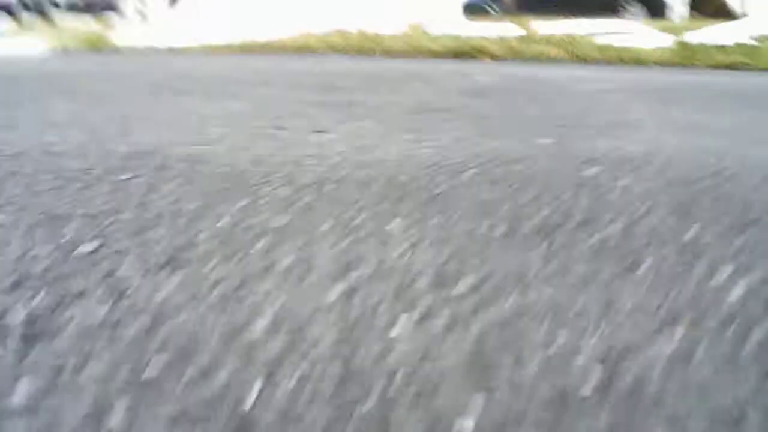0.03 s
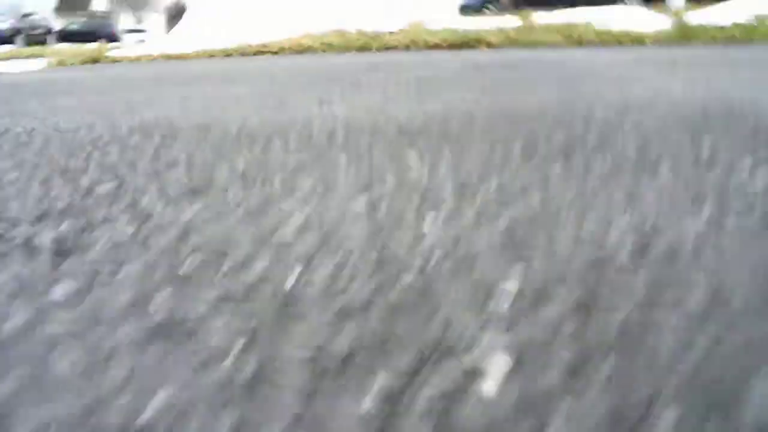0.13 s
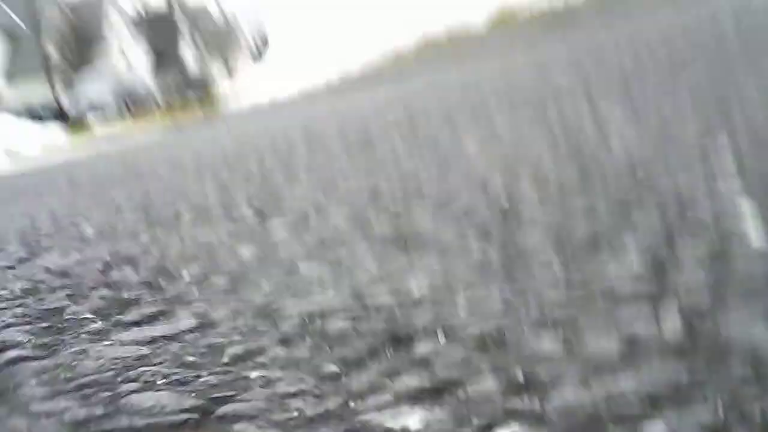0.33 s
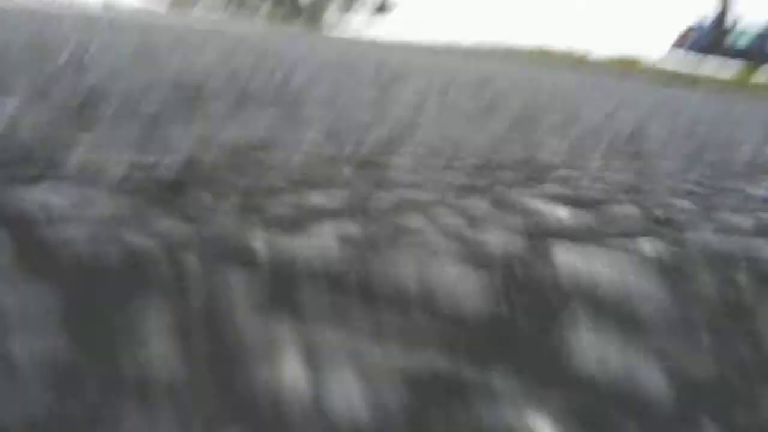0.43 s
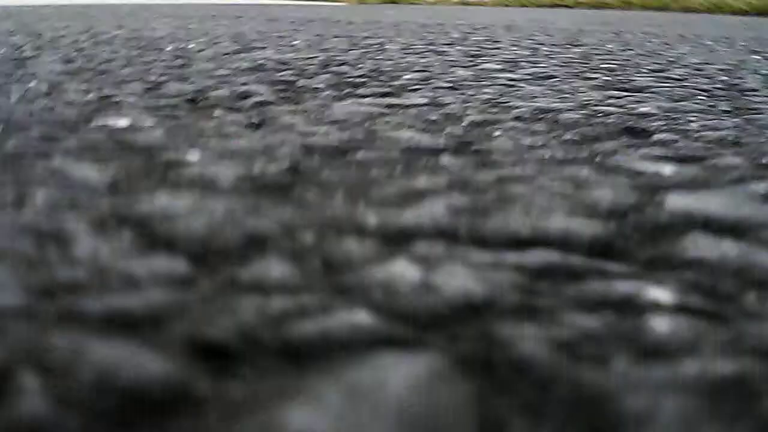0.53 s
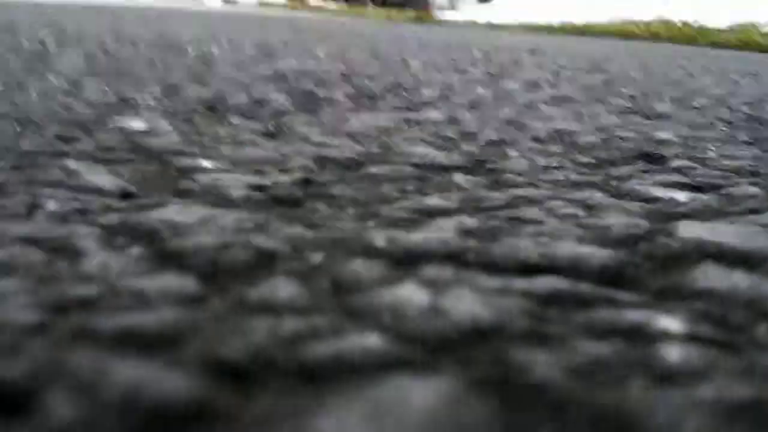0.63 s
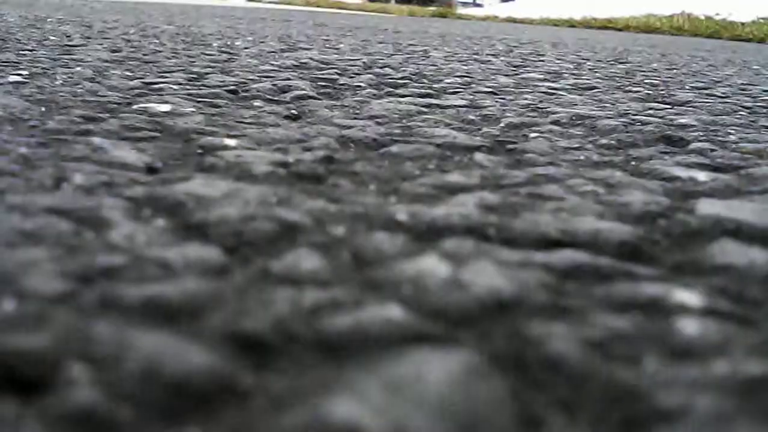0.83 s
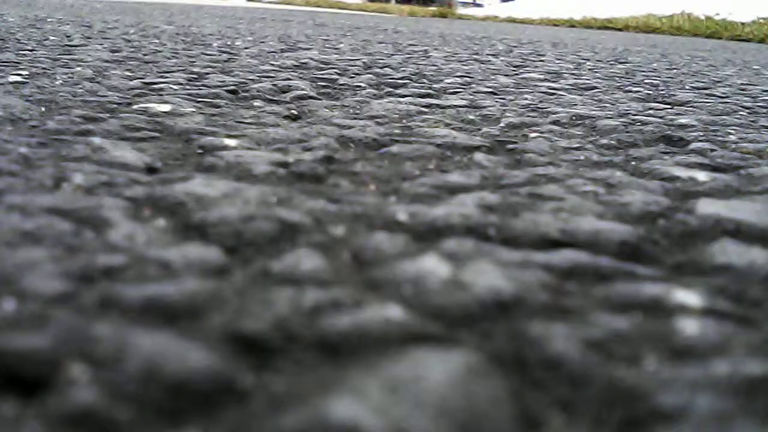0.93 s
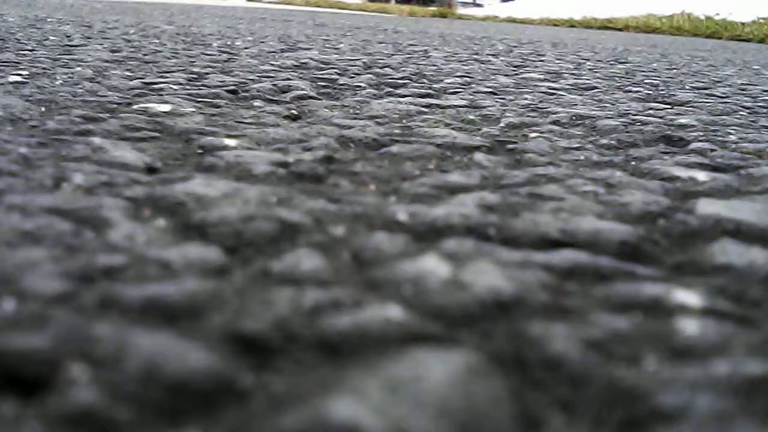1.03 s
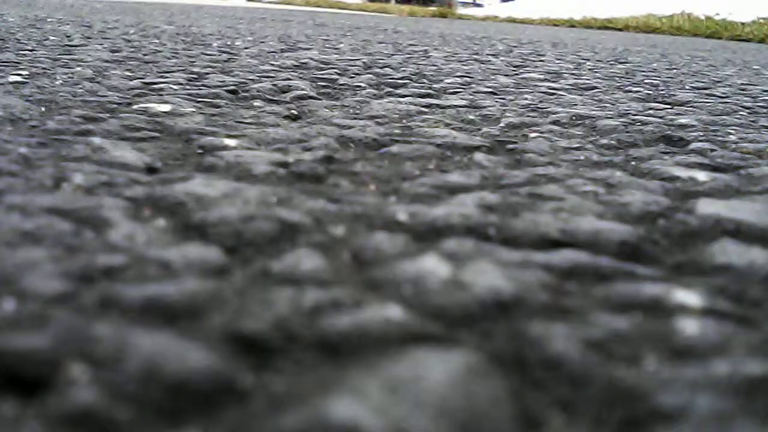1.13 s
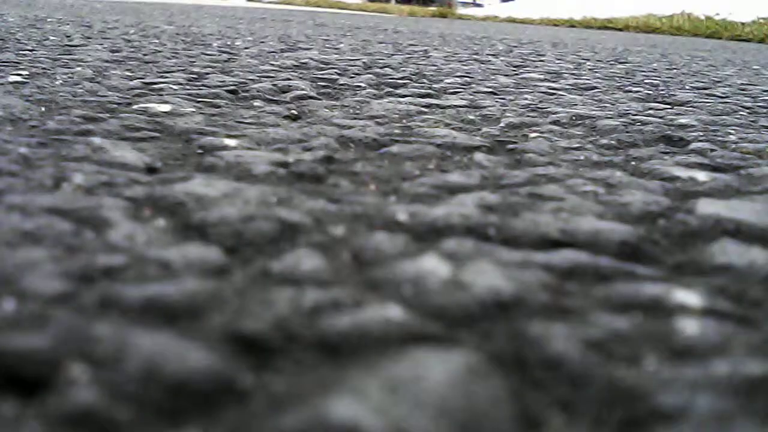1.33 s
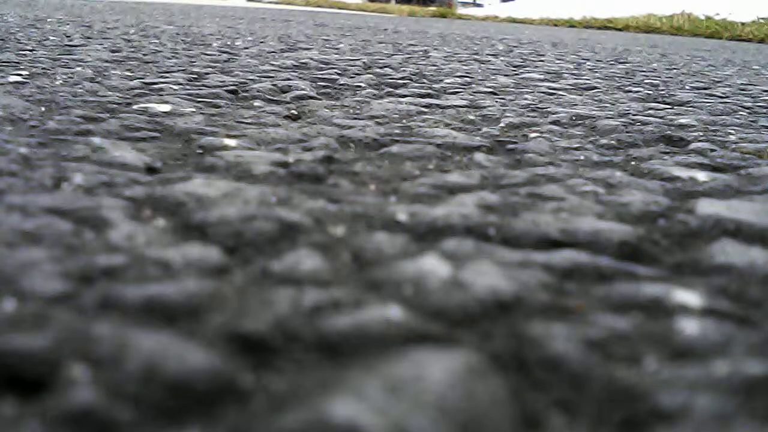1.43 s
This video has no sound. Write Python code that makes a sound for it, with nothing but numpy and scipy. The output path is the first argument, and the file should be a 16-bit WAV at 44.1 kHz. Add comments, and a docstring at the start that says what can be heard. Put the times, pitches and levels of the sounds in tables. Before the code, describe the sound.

A small drone crashes on asphalt in a quick run of loud, distorted knocks and stone clacks, then ticks and scuffs on grit as it settles. Wind rumbles on its onboard microphone over a faint electronic whine.

```python
"""Open asphalt, heard point-blank from the microphone fixed to a small camera drone as it crashes.
The craft tumbles through a quick run of knocks that shake its plastic frame and overload the microphone.
The frame rings on and stones clack against the shell, which then ticks and scuffs on grit as it settles.
Wind rumbles on the microphone and the electronics whine faintly throughout."""
import sys
import numpy as np
from scipy import signal
from scipy.fft import rfft, irfft, next_fast_len
from scipy.io import wavfile
from scipy.ndimage import map_coordinates

SR = 44100
rng = np.random.default_rng(int(sys.argv[2]) if len(sys.argv) > 2 else 0)


def dump(signal):
    """Clip the signal to [-1, 1] and save it as 16-bit WAV at the path in sys.argv[1]."""
    limited = np.clip(np.atleast_2d(signal).T, -1, 1)
    pcm = np.round(limited * 32767).astype(np.int16)
    wavfile.write(sys.argv[1], SR, pcm)


N = 66150
T = np.arange(N) / SR

# wind buffeting the microphone: time_s, level_db
RUMBLE_LEVEL = [(0, -21.5), (.04, -21), (.17, -27), (.21, -18.5), (.66, -19), (.8, -25.5), (1.1, -27),
                (1.5, -25)]
# its spectrum: freq_hz, level_db
RUMBLE_SPECTRUM = [(8, -12.5), (19, -6.5), (26, 4), (36, -11.5), (50, -10), (80, -10), (130, -18),
                   (300, -29), (500, -44.5), (1000, -56)]
# soft rush of air: time_s, level_db
AIR_LEVEL = [(0, -36.5), (.15, -37.5), (.25, -31), (.8, -35), (1.1, -33.5), (1.5, -34)]
# its spectrum: freq_hz, level_db
AIR_SPECTRUM = [(100, -3.5), (200, 0), (300, -0.5), (430, -8.5), (1000, -14.5), (1350, -20), (2100, -21.5),
                (2700, -31.5), (3200, -27), (4000, -32), (6000, -31.5), (10000, -34), (11500, -75)]
# shell sliding on grit: freq_hz, level_db
RASP_SPECTRUM = [(500, -27), (1400, -14), (2100, -3), (3000, -4), (3700, -9), (4600, 6.5), (5400, -22),
                 (8000, -15), (11000, -35)]
# scuffs of the shell on grit: start_s, level_db, hold_s, tilt_db_per_octave
SCUFFS = [(0.208, -40.5, 0.026, 3), (.852, -26, 0.0053, -5), (1.079, -35, 0.027, 4.5),
          (1.111, -24.5, 0.0021, -1), (1.265, -37, 0.013, 4), (1.332, -27, 0.015, -0.5),
          (1.486, -31, 0.0044, 4.5)]
# their spectrum before the tilt: freq_hz, level_db
SCUFF_SPECTRUM = [(150, -3), (390, 8.5), (500, -4.5), (660, 9.5), (1100, -13.5), (1500, -6), (2000, -7),
                  (2900, -28.5), (4500, -18.5), (6000, -28.5), (11000, -27.5)]
# stones on the shell, hard in the tumble and light at rest: start_s, level_db, favoured_pitch_hz
CLACKS = [(0.3631, 20, 2326), (0.4789, 13, 1300), (.5970, 2.5, 1780), (.9300, -24, 2050),
          (1.0198, -11.5, 2300), (1.0258, -12.5, 2300), (1.054, -19.5, 2110), (1.1124, -19.5, 1690),
          (1.3340, -16, 2060), (1.4840, -20.5, 1970)]
# modes of the plastic shell: pitch_hz, level_db, t60_s
SHELL_MODES = [(1264, -13.5, 0.025), (1760, -17.5, 0.011), (2040, -6.5, 0.011), (2296, -14.5, 0.0091)]
# a stone's own tick: freq_hz, level_db
TICK_SPECTRUM = [(300, -1.5), (1300, -16), (2150, -24), (3000, -16), (3700, -27), (4500, -6.5), (5500, -31),
                 (7300, -15), (11000, -40.5)]
# blows on the asphalt: start_s, heave_db, ring_db, crunch_db, crunch_delay_s
BLOWS = [(0.275, 13.5, 0.5, 5, .0025), (0.2809, 15, 10, -8, .0005), (0.359, 10.5, 8, 4, 0.0039),
         (0.416, -20, -0.5, 0.5, 0.00054), (.4210, 12, 1, -13.5, .004), (.4268, 6.5, 3, 5, 0.00023),
         (.4680, 7.5, -0.5, 2.5, 0.002), (0.4782, 7.5, -3.5, 7, 0.0012), (.5080, 13.5, 7, -6.5, 0.00041),
         (0.543, 9.5, 6.5, -1, 0.0025), (.5530, 13, 2, 1.5, .001), (0.5583, 4, -3, 2.5, .0004),
         (0.5978, 5, -3, -13, .002), (.6060, 0, 2, -16, .003), (0.6198, 2, 0.5, -3, 0.00028),
         (.6420, -0.5, -7, -41, .001)]
# modes of the frame: pitch_hz, level_db, t60_s
FRAME_MODES = [(68, -4.5, 0.19), (99.42, -4, 0.25), (136.05, -7, 0.26), (207.5, -4.5, 0.092),
               (244.1, -11.5, 0.14), (294.1, -6.5, 0.15), (352.7, -6.5, 0.11), (516.8, -11.5, 0.083),
               (573.4, -9, 0.037), (662, -18.5, 0.085), (908, -22.5, 0.039)]
# shell crunching on stone: freq_hz, level_db
CRUNCH_SPECTRUM = [(200, 5), (600, 3), (1300, -5), (1700, -8.5), (2250, -7.5), (2800, -23.5), (4200, -11),
                   (6000, -29), (11000, -31)]
# drag after each blow: freq_hz, level_db
SKID_SPECTRUM = [(60, -13.5), (280, 7), (450, 0), (650, -10), (1000, -16), (2200, -22), (3000, -22),
                 (5000, -33), (10000, -93)]
# microphone response after the overload: freq_hz, gain_db
MIC_RESPONSE = [(2300, 0), (3500, -9), (5000, -14.5), (8000, -19.5), (11000, -23.5)]


def amp(db):
    """Decibels to amplitude."""
    return 10 ** (np.asarray(db) / 20)


def unit(x):
    """x scaled to rms 1."""
    return x / np.sqrt(np.mean(x ** 2) + 1e-20)


def along(points, hz):
    """(freq_hz, value) points joined on a log axis and read at hz."""
    freqs, values = np.transpose(points)
    return np.interp(np.log(hz + 1), np.log(freqs + 1), values)


def curve(points):
    """(time_s, value) points joined, one value per sample."""
    return np.interp(T, *np.transpose(points))


def wobble(knots_per_s):
    """A smooth random curve."""
    return map_coordinates(rng.standard_normal(4096), [T * knots_per_s + 2], mode="wrap")


def filtered(x, response):
    """x shaped by a gain that depends on frequency."""
    size = next_fast_len(N + SR // 2)
    return irfft(rfft(x, size) * response(np.fft.rfftfreq(size, 1 / SR)), size)[:N]


def noise(spectrum, tilt_db=0):
    """Coloured noise of rms 1, tilted per octave between 200 and 5000 Hz."""
    def colour(hz):
        return amp(along(spectrum, hz) + tilt_db * np.log2(np.clip(hz, 200, 5000)))
    return unit(filtered(rng.standard_normal(N), colour))


def fade(start_s, t60_s):
    """Full level until start_s, then an exponential decay."""
    return amp(-60 * np.maximum(T - start_s, 0) / t60_s)


def swell(centre_s, width_s):
    """A bell-shaped envelope."""
    return np.exp(-.5 * ((T - centre_s) / width_s) ** 2)


def ring(start_s, hz, t60_s):
    """One struck mode dying away."""
    return np.sin(2 * np.pi * hz * np.maximum(T - start_s, 0)) * fade(start_s, t60_s)


def struck(start_s, modes):
    """Modes struck together, a little different in level and pitch at every blow."""
    return sum(amp(db + rng.normal(0, .7)) * ring(start_s, hz * (1 + rng.normal(0, .003)), t60_s)
               for hz, db, t60_s in modes)


def wind():
    """Low buffeting right on the microphone under a soft, fluttering rush of air."""
    rumble = amp(curve(RUMBLE_LEVEL)) * noise(RUMBLE_SPECTRUM)
    air = amp(curve(AIR_LEVEL) + wobble(59.7)) * noise(AIR_SPECTRUM)
    return rumble + air


def whine(pitch_hz=5043, dip_hz=210, jitter_hz=42):
    """The electronics beside the microphone: a thin tone and its octave, with quick dips in pitch."""
    dips = np.clip(2 * wobble(110) - .5, 0, 1)
    hz = pitch_hz - dip_hz * dips + jitter_hz * wobble(700)
    phase = 2 * np.pi * np.cumsum(hz) / SR
    return amp(-46.5) * unit(np.sin(phase) + amp(-3) * np.sin(2 * phase))


def grit():
    """Grit under the shell: one short rasp as it slides, and a scatter of grainy scuffs."""
    out = amp(-34.5) * noise(RASP_SPECTRUM) * swell(centre_s=1.042, width_s=.016)
    for start_s, db, hold_s, tilt_db in SCUFFS:
        grain = unit(noise(SCUFF_SPECTRUM, tilt_db) * amp(3 * wobble(500)))
        attack = np.clip((T - start_s) / .0007, 0, 1)
        out += amp(db) * grain * attack * fade(start_s + hold_s, t60_s=.018)
    return out


def clacks(focus_db_per_octave=32.5):
    """A stone ticks and rings the shell; where it lands favours the modes near one pitch."""
    out = np.zeros(N)
    for start_s, db, favoured_hz in CLACKS:
        modes = [(hz, mode_db - focus_db_per_octave * abs(np.log2(hz / favoured_hz)), t60_s)
                 for hz, mode_db, t60_s in SHELL_MODES]
        tick = amp(-18.5) * noise(TICK_SPECTRUM) * (T >= start_s) * fade(start_s, t60_s=.011)
        out += amp(db) * (struck(start_s, modes) + tick)
    return out


def tumble(flex_s=.00602, skid_db=-17.5):
    """The legs flex, then the hard contact heaves the craft, rings the frame, crunches and drags on."""
    out = np.zeros(N)
    for start_s, heave_db, ring_db, crunch_db, delay_s in BLOWS:
        flex = np.sin(np.pi * np.clip((T - start_s) / flex_s + 1, 0, 1))  # ends at the hard contact
        rebound = ring(start_s, hz=35.2, t60_s=.077)  # the whole craft moves
        heave = amp(heave_db) * (rebound - amp(-2) * flex)
        crunch = amp(crunch_db) * noise(CRUNCH_SPECTRUM) * swell(start_s + delay_s, width_s=.0017)
        skid_gain = amp(skid_db + 4.5 * wobble(250))  # grainy, relative to the frame's ring
        skid = skid_gain * noise(SKID_SPECTRUM) * (T >= start_s) * fade(start_s, t60_s=.14)
        out += heave + crunch + amp(ring_db) * (struck(start_s, FRAME_MODES) + skid)
    return out


def scene():
    """Everything reaches the one microphone on the craft, close and dry."""
    return (tumble() + clacks() + grit() + wind() + whine())[None]


def record(dry, ceiling=.64, knee=14, top_hz=11300):
    """The overloaded microphone flattens the blows, dulls the treble and stops at its band limit."""
    def response(hz):
        return amp(along(MIC_RESPONSE, hz)) / np.sqrt(1 + (hz / top_hz) ** 60)
    oversampled = signal.resample_poly(dry[0], 4, 1)
    clipped = oversampled / (1 + np.abs(oversampled / ceiling) ** knee) ** (1 / knee)
    return filtered(signal.resample_poly(clipped, 1, 4), response)[None]


dry = scene()
out = record(dry)
dump(out)
```